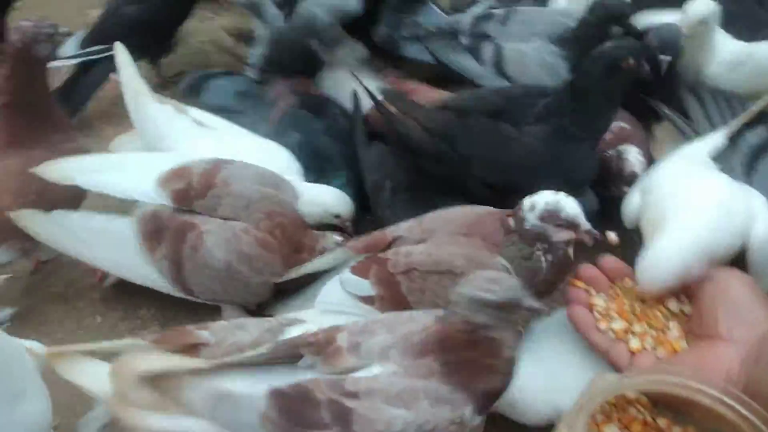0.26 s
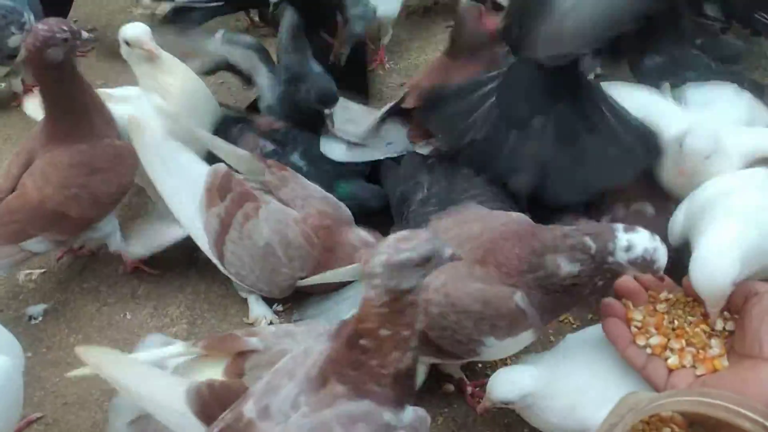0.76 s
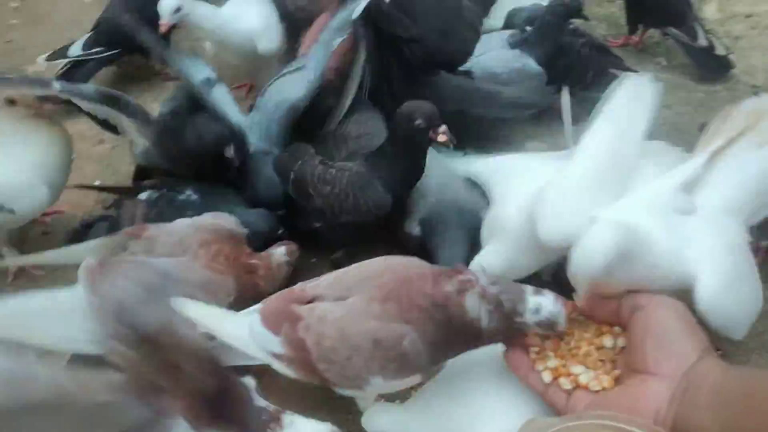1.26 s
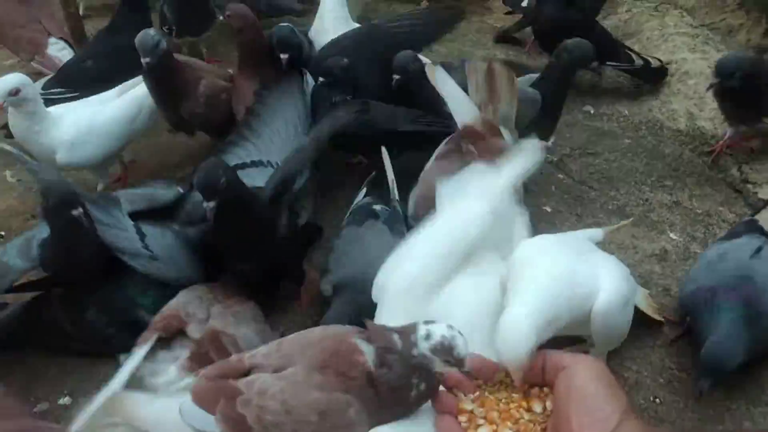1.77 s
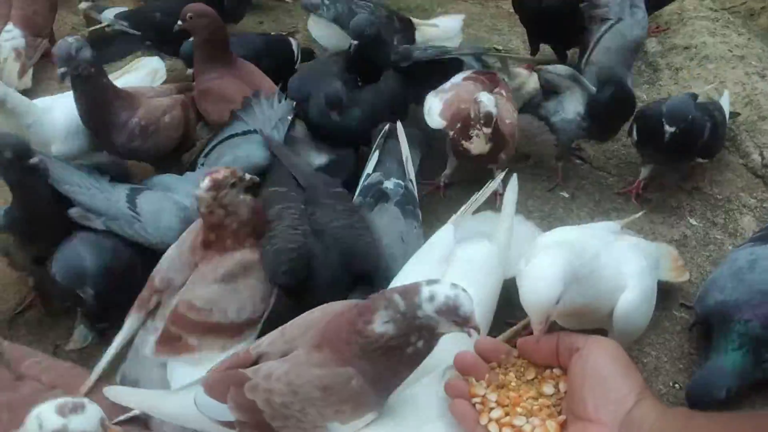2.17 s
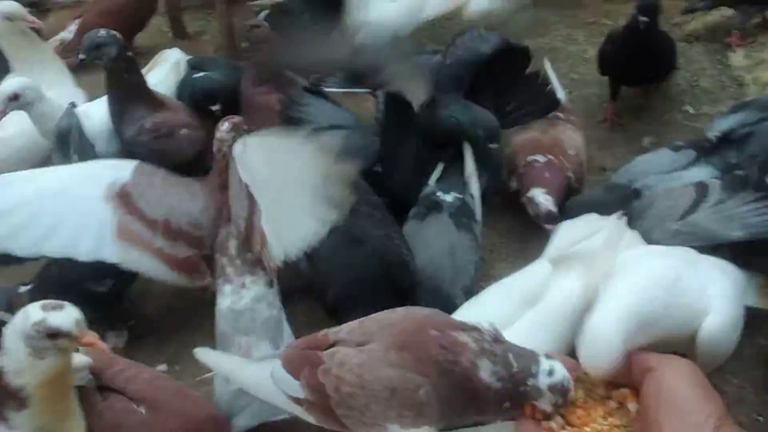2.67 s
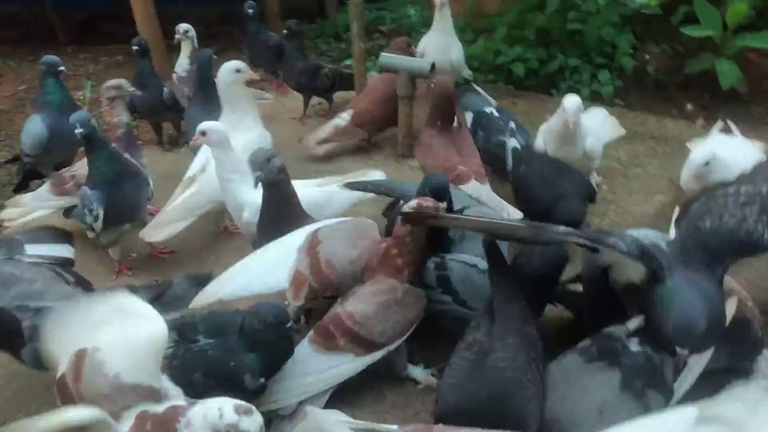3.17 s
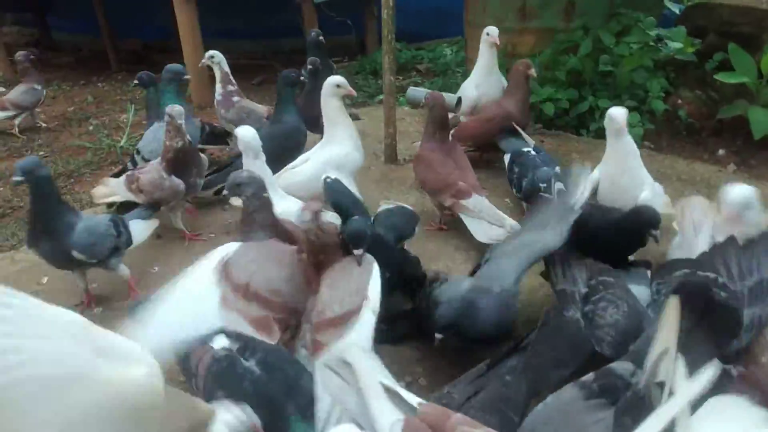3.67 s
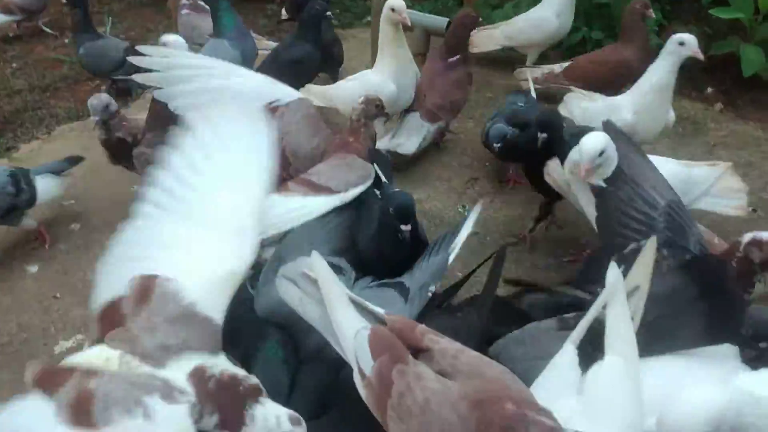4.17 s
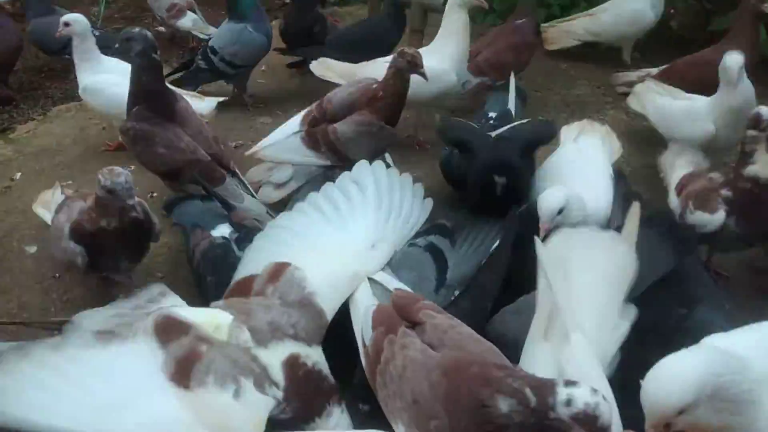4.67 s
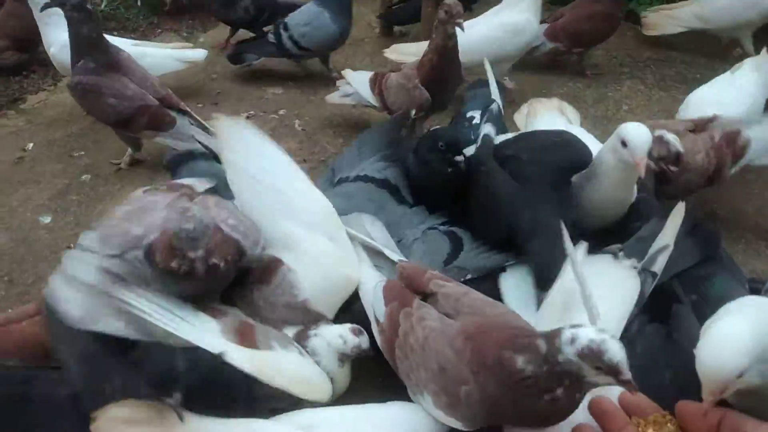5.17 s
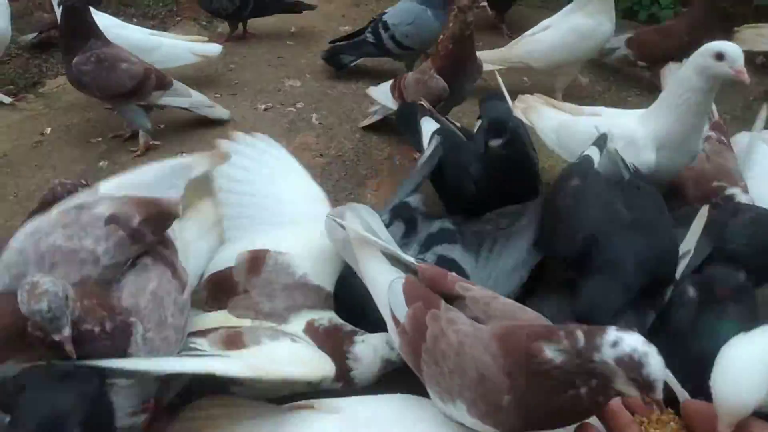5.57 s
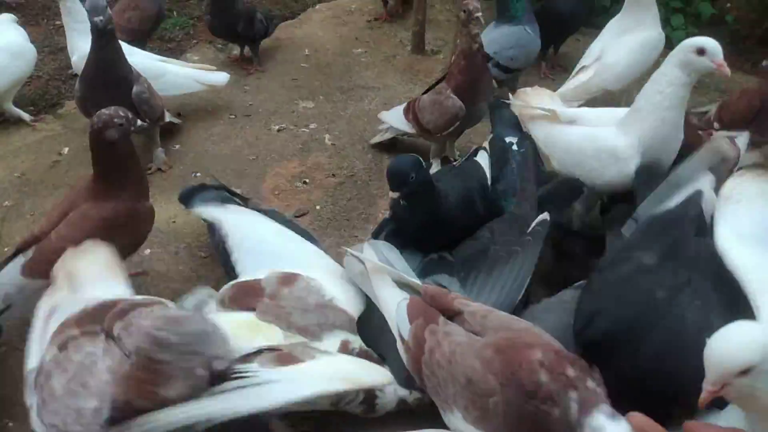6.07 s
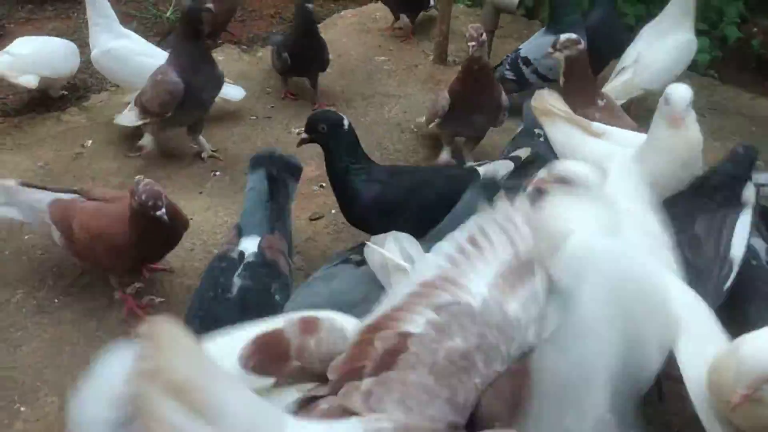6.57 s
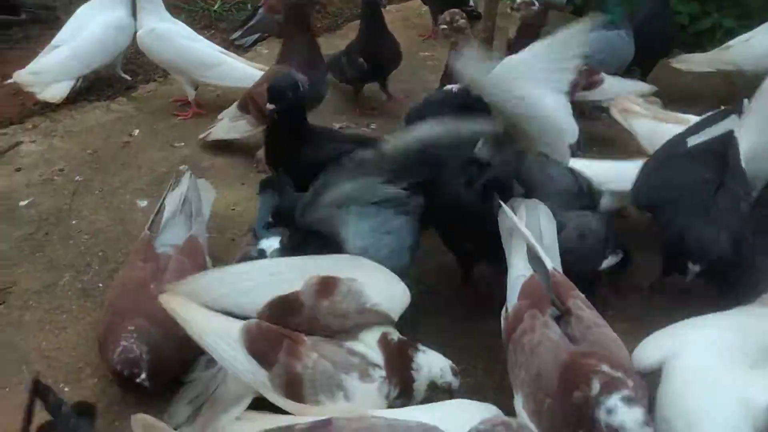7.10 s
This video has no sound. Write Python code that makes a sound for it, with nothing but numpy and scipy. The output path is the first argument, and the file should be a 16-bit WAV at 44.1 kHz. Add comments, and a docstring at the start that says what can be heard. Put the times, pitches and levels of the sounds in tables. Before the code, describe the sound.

Pigeons jostle for grain in a yard, feathers rustling, wings slapping, beaks tapping, young birds squeaking, with two husky coos and air thumps.

```python
"""Pigeons jostling for grain

A flock of pigeons jostles for grain held out in a hand, in an open yard. Feathers rustle by stick and slip,
wings slap as noise bursts and fan air over the microphone as pressure pulses, and beaks tap as damped
resonances. One bird coos twice with a crop-filtered octave, and youngsters squeak with two-voiced hoarse tones.
The left microphone port rings in the treble; the right one is covered and passes little but rumble."""
import sys
import numpy as np
from scipy import signal
from scipy.fft import rfft, irfft, next_fast_len
from scipy.io import wavfile

SR = 44100
rng = np.random.default_rng(int(sys.argv[2]) if len(sys.argv) > 2 else 0)


def transcribe(signal):
    """Save signal, clipped to [-1, 1], as a 16-bit WAV file at the path in sys.argv[1]."""
    frames = np.atleast_2d(signal).T
    limited = np.clip(frames, -1, 1)
    pcm = np.round(limited * 32767).astype(np.int16)
    wavfile.write(sys.argv[1], SR, pcm)


N = 323694
TIME = np.arange(N) / SR   # seconds


def from_db(db):
    """Level to amplitude: 20 dB is a factor of ten."""
    return 10 ** (np.asarray(db) / 20)


def rms_one(x):
    """Normalisation to unit effective value."""
    return x / np.sqrt(np.mean(x ** 2) + 1e-20)


def add(out, start_s, x):
    """Superposition: a short sound is summed in at its moment."""
    at = max(int(start_s * SR), 0)
    out[at:at + len(x)] += x[:max(N - at, 0)]


def butter(x, edges_hz, kind, order=2):
    """Causal Butterworth filter, maximally flat in its passband."""
    edges_hz = np.clip(edges_hz, 10, .48 * SR)
    return signal.sosfilt(signal.butter(order, edges_hz, kind, fs=SR, output="sos"), x)


def resonance(x, hz, width_hz):
    """Two-pole resonance: damping sets the width, and the gain at the peak is 1."""
    r = np.exp(-np.pi * width_hz / SR)
    feedforward = np.array([1, 0, -1]) * (1 - r * r) / 2
    feedback = [1, -2 * r * np.cos(2 * np.pi * hz / SR), r * r]
    return signal.lfilter(feedforward, feedback, x + 1e-18)


def double_resonance(x, hz, width_hz):
    """Two equal resonances in series give steeper skirts."""
    return resonance(resonance(x, hz, width_hz), hz, width_hz)


def colour(x, spectrum):
    """Linear filtering by a gain curve that is interpolated over log frequency."""
    hz, db = np.transpose(spectrum)
    size = next_fast_len(len(x))
    bins = np.maximum(np.arange(size // 2 + 1) * SR / size, 1)
    gain = from_db(np.interp(np.log(bins), np.log(hz), db))
    return irfft(rfft(x, size) * gain, size)[:len(x)]


def noise(spectrum):
    """Stationary coloured noise of unit rms."""
    return rms_one(colour(rng.standard_normal(N), spectrum))


def noise_band(low_hz, high_hz, order=2):
    """Band-limited noise of unit rms."""
    return rms_one(butter(rng.standard_normal(N), [low_hz, high_hz], "band", order))


def drift(per_s):
    """Random modulation of unit rms: straight lines join random values, per_s of them each second."""
    return rms_one(np.interp(TIME * per_s, np.arange(N), rng.standard_normal(N)))


def in_time(curve):
    """Linear interpolation of a control curve at every sample."""
    return np.interp(TIME, *np.transpose(curve))


def phase_of(pitch_hz):
    """Phase in radians is the time integral of frequency."""
    return 2 * np.pi * np.cumsum(pitch_hz) / SR


def yard_murmur(level_db):
    """Diffuse background: a stationary random sound with a fixed spectrum."""
    # Spectrum of the yard. Each row: frequency in Hz, relative density in dB.
    murmur_spectrum = [(40, -4.5), (65, 2), (100, -1), (130, -7.5), (195, -14), (250, -5.5), (300, -13.5),
                       (450, -12), (1000, -22), (2000, -29), (7000, -31), (10000, -29.5), (16000, -60)]
    return from_db(level_db) * noise(murmur_spectrum)


def drone():
    """Narrow-band noise: far-off motor noise arrives as a few blurred low tones."""
    # Blurred tones. Each row: frequency in Hz, half the resonator width in Hz, level in dB.
    drone_bands = [(81.5, 9.6, -55.5), (95.6, 10.6, -55), (246.7, 19, -66.5)]
    out = np.zeros(N)
    for hz, width_hz, db in drone_bands:
        out += from_db(db) * rms_one(double_resonance(rng.standard_normal(N), hz, 2 * width_hz))
    return out


def draught_rumble(spectrum, level_db, follows):
    """Modulated low-frequency noise: moving air rumbles, its level following the draught in part."""
    # Air stirred by the flock. Each row: time in seconds, draught level in dB (its mean is removed).
    draught_curve = [(0.0, -41), (1.12, -57.5), (1.47, -42), (1.86, -55), (2.33, -57.5), (2.8, -47.5),
                     (3.39, -48.5), (4.48, -60.5), (5.72, -57), (5.93, -61), (6.48, -57.5), (7.34, -55.5)]
    draught_db = in_time(draught_curve)
    return from_db(level_db + follows * (draught_db - draught_db.mean())) * noise(spectrum)


def far_calls(waver=0.019):
    """Spectral loss over distance leaves only one wavering partial of each animal call."""
    # Thin calls. Each row: start in seconds, length in seconds, mean pitch in Hz, level in dB.
    thin_calls = [(1.72, 0.045, 1220, -56.5), (1.86, 0.043, 1274, -56), (2.98, .42, 1043, -66.5),
                  (4.64, 0.24, 1181, -67.5), (7.17, 0.069, 2320, -63)]
    out, wobble = np.zeros(N), 1 + waver * drift(150)
    for s, length_s, hz, db in thin_calls:
        on = (TIME > s) & (TIME < s + length_s)
        partial = np.sin(phase_of(hz * wobble[on]))
        out[on] += from_db(db) * partial * signal.windows.tukey(on.sum(), .6)
    return out


def begging_notes(every_s=.113, fall=0.05, fade_db=3.5, raspier_db=4.5):
    """Repetition with fatigue: each further note of a bout is lower, its tone weaker and its rasp stronger."""
    # Bouts. Each row: start in seconds, number of notes, first note's pitch in Hz,
    # its relative tone level in dB, its relative rasp level in dB.
    begging_bouts = [(0.31, 2, 2880, -53.5, -55.5), (0.904, 2, 2936, -52, -58.5), (1.52, 2, 2580, -54, -58),
                     (2.21, 1, 3200, -50.5, -64), (2.739, 1, 3085, -51.5, -52), (2.96, 1, 2605, -60, -56.5),
                     (3.125, 1, 3250, -62.5, -78), (3.965, 2, 2785, -53.5, -59.5),
                     (4.825, 3, 3135, -51.5, -63), (5.655, 2, 2360, -52, -61), (6.68, 1, 3270, -54.5, -61),
                     (6.95, 1, 1995, -64.5, -61.5)]
    notes = []
    for s, count, hz, tone_db, rasp_db in begging_bouts:
        for k in range(round(count)):
            notes.append((s + k * every_s, hz * (1 - fall * k), tone_db - fade_db * k, rasp_db + raspier_db * k))
    return notes


def squeaks(note_s=0.1416, hoarseness=0.0284, scoop=0.07, droop=0.0398, second_ratio=.81, second_db=-7.5,
            level_db=-0.5, rasp_db=-2.5, flutter_db=2.0):
    """Two-source voice: both sides of a young syrinx whistle hoarsely, scoop up and sag, over a noisy rasp."""
    # Harmonics of each side. Each row: multiple of its pitch, relative level in dB.
    squeak_partials = [(1, -12.5), (2, -1), (3, -10.5)]
    out, wobbles, flutter = np.zeros(N), (drift(1200), drift(1200)), from_db(flutter_db * drift(180))
    rasp = noise_band(3900, 6300, order=3)
    for s, hz, tone_db, noise_db in begging_notes():
        on = (TIME > s) & (TIME < s + note_s)
        u = (TIME[on] - s) / note_s   # 0 to 1 through the note
        arch = 1 - scoop * (1 - u) ** 4 + droop * (.5 - u)
        voice = from_db(noise_db + rasp_db) * rasp[on]
        for ratio, db, wobble in zip((1, second_ratio), (tone_db, tone_db + second_db), wobbles):
            phase = phase_of(hz * ratio * (arch + hoarseness * wobble[on]))
            for k, partial_db in squeak_partials:
                voice = voice + from_db(db + level_db + partial_db) * np.sin(round(k) * phase)
        out[on] += voice * flutter[on] * np.sin(np.pi * u ** 0.61)
    return out


def clucks(bend=0.11, fall_s=0.0097, rise_s=0.0018, decay_s=0.0099, level_db=9.5, gruffness=0.1, husk_db=-23.0):
    """Impulsive voicing: a short push of the throat gives a gruff, husky hoot that drops in pitch as it dies."""
    # Notes that open each coo. Each row: start in seconds, relative level in dB, pitch in Hz before the bend.
    stuttered_notes = [(0.713, -35, 420), (0.791, -41.5, 367), (0.892, -44, 330), (1.872, -44, 400),
                       (1.958, -36, 409), (2.05, -37.5, 378), (2.146, -42.5, 355)]
    out, t, wobble = np.zeros(N), TIME[:SR // 8], drift(300)
    husk = from_db(husk_db) * noise_band(280, 600)
    envelope = (1 - np.exp(-t / rise_s)) * np.exp(-t / decay_s)
    for s, db, hz in stuttered_notes:
        here = slice(int(s * SR), int(s * SR) + len(t))
        pitch = hz * (1 + bend * np.exp(-t / fall_s) + gruffness * wobble[here])
        hoot = np.sin(phase_of(pitch)) + husk[here]
        add(out, s, from_db(db + level_db) * hoot * envelope)
    return out


def coos(jitter=0.018, shimmer_db=2.3, attack_s=0.044, release_s=0.089, husk_db=-13, bend=0.129, settle_s=0.0338,
         crop_hz=507, crop_width_hz=56, crop_db=5):
    """Source and filter: the swollen crop lifts the octave of a husky tone as it nears the crop resonance."""
    # Drawn-out ends. Each row: start in seconds, length in seconds,
    # first and last pitch in Hz before bend and jitter, mean level in dB of the fundamental before fades.
    drawn_out_notes = [(0.90, 0.35, 307, 268, -46), (2.165, 0.30, 278, 222, -45.5)]
    out, wobble, tremble_db = np.zeros(N), 1 + jitter * drift(92), shimmer_db * drift(70)
    husk = from_db(husk_db) * noise_band(280, 520)
    for s, length_s, first_hz, last_hz, db in drawn_out_notes:
        on = (TIME > s) & (TIME < s + length_s)
        t = TIME[on] - s
        # starts sharp, settles, then sinks steadily
        pitch = np.linspace(first_hz, last_hz, len(t)) * (1 + bend * np.exp(-t / settle_s))
        octave = from_db(crop_db) / (1 + (2 * (2 * pitch - crop_hz) / crop_width_hz) ** 2)
        phase = phase_of(pitch * wobble[on])
        envelope = np.minimum(t / attack_s, 1) * np.minimum((length_s - t) / release_s, 1)
        voice = np.sin(phase) + octave * np.sin(2 * phase) + husk[on]
        out[on] += from_db(db + tremble_db[on]) * envelope * voice
    return out


def jostling(level_db=-3.5, swing=0.83):
    """Energy addition: the flock's shoving and the bell-shaped swells of near wing sweeps sum in power."""
    # How hard the flock jostles. Each row: time in seconds, rustle level in dB before swing and offset.
    jostle_curve = [(0.0, -54.5), (0.41, -53), (0.59, -48.5), (1.14, -52.5), (1.29, -48), (1.49, -46),
                    (1.78, -49), (2.51, -55.5), (2.8, -49.5), (3.43, -56), (4.03, -52), (4.66, -57.5),
                    (5.72, -53.5), (5.95, -62), (6.32, -55), (6.58, -43), (7.03, -56.5), (7.34, -54.5)]
    # Wings sweeping over a neighbour's feathers. Each row: middle in seconds, level in dB,
    # half length in seconds.
    wing_sweeps = [(0.436, -47, 0.02), (0.524, -43.5, 0.021), (0.734, -46, 0.035), (1.362, -45, 0.021),
                   (1.427, -41, 0.0078), (2.823, -46.5, 0.013), (6.596, -39, .007), (6.697, -45, 0.038)]
    flock_db = in_time(jostle_curve)
    mean_db = flock_db.mean()
    near = np.zeros(N)
    for s, db, half_s in wing_sweeps:
        near += from_db(db) * np.exp(-((TIME - s) / half_s) ** 2 / 2)
    return np.hypot(from_db(level_db + mean_db + swing * (flock_db - mean_db)), near)


def rustle(shove_db=1.15, shoves_per_s=11, stroke_db=2.5, flutter_db=1.0, snags_per_s=260, snag_spread_db=9.5,
           snag_db=-12.5):
    """Stick-slip friction: feathers slide in short strokes; barbs snag and let go with tiny ticks."""
    # Spectrum of sliding feathers. Each row: frequency in Hz, relative density in dB.
    feather_spectrum = [(100, 13), (500, 8), (1200, 1.5), (2500, -1.5), (4500, -1.5), (7000, 1.5),
                        (10000, -1.5), (13000, -2), (16000, -1)]
    unevenness_db = shove_db * drift(shoves_per_s) + stroke_db * drift(35) + flutter_db * drift(260)
    effort = jostling() * from_db(unevenness_db)
    sizes = from_db(snag_spread_db * np.minimum(rng.exponential(1, N), 4)) * rng.choice([-1, 1], N)
    happens = rng.random(N) < snags_per_s / SR
    snags = rms_one(colour(sizes * happens, feather_spectrum))
    return effort * (noise(feather_spectrum) + from_db(snag_db) * snags)


def tap(hz, decay_s=0.0022, damping=0.63, rise_s=0.00028, scratch_db=-29.0):
    """Impact excitation: a brief scratchy contact drives one heavily damped resonance."""
    t = TIME[:SR // 30]
    length_s = decay_s * (2000 / hz) ** .5   # small hard contacts die sooner
    contact = (1 - np.exp(-t / rise_s)) * np.exp(-t / length_s)
    scratch = np.sign(rng.standard_normal(len(t))) * contact
    ringing = double_resonance(scratch, hz, damping * hz)
    return rms_one(ringing) * np.std(scratch) + from_db(scratch_db) * scratch


def pecks(level_db=0.5, ticks_db=-48.5, steps_db=-50.5, count=70):
    """Random superposition: near beaks tap clearly; the rest of the flock ticks and patters faintly."""
    # Nearest beaks on grain, skin and ground. Each row: start in seconds, relative level in dB,
    # resonance in Hz.
    near_beaks = [(0.414, -45, 895), (0.937, -41.5, 1220), (1.455, -26.5, 1810), (2.51, -38, 1160),
                  (2.951, -45, 1600), (3.009, -37, 1900), (3.339, -45.5, 1950), (3.463, -40, 1350),
                  (3.605, -40, 10200), (3.695, -36, 10900), (4.017, -30, 10200), (4.469, -35.5, 850),
                  (4.68, -49, 4900), (4.985, -35.5, 4600), (5.186, -50, 8500), (5.566, -39.5, 2900),
                  (5.977, -45, 5000), (6.218, -46.5, 7000), (6.29, -43.5, 1510)]
    out = np.zeros(N)
    for s, db, hz in near_beaks:
        add(out, s, from_db(db + level_db) * tap(hz))
    for tick_at, step_at, size, pitch in rng.random((count, 4)):
        add(out, tick_at * N / SR, from_db(ticks_db) * size * tap(5500 * 2 ** pitch))
        add(out, step_at * N / SR, from_db(steps_db) * size * tap(800 * 2 ** pitch))
    return out


def gusts():
    """Unsteady flow: each stroke pushes then pulls the air, and its eddies buffet the port (swing, eddies)."""
    # Wing strokes. Each row: middle in seconds, relative pressure swing in dB, relative turbulence in dB,
    # half length in seconds, upper edge of the turbulence in Hz.
    wing_strokes = [(0.465, -40, -44, .033, 150), (0.715, -27.5, -40.5, .01, 200),
                    (1.357, -13.5, -34.5, 0.0092, 120), (1.431, -29, -30, .01, 150),
                    (1.451, -17, -18.5, 0.0038, 170), (1.47, -24, -19, .012, 290),
                    (1.49, -22, -30, .0047, 695), (1.518, -42, -33.5, .024, 149),
                    (2.82, -40, -44, .02, 120), (6.601, -47, -31, 0.0074, 520),
                    (6.69, -39.5, -49, 0.031, 350), (7.11, -45.5, -49.5, .04, 130)]
    swing, eddies, t = np.zeros(N), np.zeros(N), TIME[:SR // 2]
    for s, swing_db, eddy_db, half_s, edge_hz in wing_strokes:
        u = (t - t.mean()) / half_s
        bell = np.exp(-u * u / 2)
        turbulence = butter(rng.standard_normal(len(t)), edge_hz, "low")
        swirl = butter(turbulence, 60, "high") * bell
        add(swing, s - t.mean(), -from_db(swing_db) * 2 * u * bell ** 2)
        add(eddies, s - t.mean(), from_db(eddy_db) * rms_one(swirl) * np.sqrt(np.mean(bell ** 2)))
    return swing, eddies


def slaps(crack_db=-4.5, tail_db=-19.0, tail_s=0.016, quill_db=10.5, rise_share=0.16):
    """Impact noise with two decays: quills strike raggedly over the wing's duller clap, then slide apart."""
    # Wing slaps. Each row: start in seconds, relative crack level in dB, relative body level in dB,
    # time constant of the main decay in seconds.
    wing_slaps = [(0.403, -30.5, -41, 0.0032), (0.483, -27, -51, 0.0019), (0.507, -27, -27.5, .0045),
                  (0.589, -29.5, -40, .0035), (0.6246, -20, -23, 0.0033), (0.708, -23.5, -31.5, 0.0015),
                  (0.859, -38, -44, 0.0056), (0.902, -32.5, -60, 0.0013), (0.938, -33, -39, 0.002),
                  (0.992, -41, -45, .0036), (1.347, -30, -36, 0.0055), (1.363, -31, -33, 0.0066),
                  (1.445, -19, -31, 0.0038), (1.469, -22.5, -36, 0.002), (1.617, -42.5, -38, .006),
                  (2.762, -39, -40, .0054), (2.812, -39, -37, 0.0064), (3.01, -27.5, -56, 0.0011),
                  (3.013, -30, -60, 0.0014), (6.584, -25.5, -35, 0.012), (6.6, -20.5, -25, 0.0038),
                  (6.639, -24, -25, 0.0036), (6.785, -38, -46, .005), (6.809, -35.5, -38.5, 0.0018)]
    out, t = np.zeros(N), TIME[:SR // 6]
    volley = np.tanh(rng.standard_normal(N)) * from_db(quill_db * np.tanh(drift(2500)))
    quills = rms_one(butter(volley, [1300, 14000], "band", order=1))
    clap = np.sign(butter(rng.standard_normal(N), 1500, "low"))
    clap = rms_one(butter(clap, [270, 1300], "band"))
    for s, crack, body_db, decay_s in wing_slaps:
        here = slice(int(s * SR), int(s * SR) + len(t))
        attack = 1 - np.exp(-t / (rise_share * decay_s))
        decay = np.exp(-t / decay_s) + from_db(tail_db) * np.exp(-t / tail_s)
        strike = from_db(crack + crack_db) * quills[here] + from_db(body_db) * clap[here]
        add(out, s, attack * decay * strike)
    return out


def yard(x, scatter_db, t60, wall_hz=6500):
    """Reverberation: walls, posts and bushes scatter back a short, dull tail that loses 60 dB in t60 seconds."""
    t = TIME[:SR // 2]
    scattered = butter(rng.standard_normal(len(t)), wall_hz, "low", order=1)
    tail = scattered * from_db(-60 * t / t60) * (t > .006)
    return x + from_db(scatter_db) * signal.fftconvolve(x, tail / np.sqrt(np.sum(tail ** 2)))[:N]


def through_cover(x, smear_s=0.0011):
    """Multipath transmission: sound leaks into the covered port by many short paths, muffled and smeared."""
    # Transmission of the cover. Each row: frequency in Hz, gain in dB.
    cover_gain = [(20, -20), (90, -11), (250, -25.5), (600, -23.5), (1500, -29), (4000, -36.5), (7500, -31),
                  (11000, -31), (16000, -18)]
    t = TIME[:SR // 50]
    paths = rng.standard_normal(len(t)) * np.exp(-t / smear_s)
    return colour(signal.fftconvolve(x, paths / np.sqrt(np.sum(paths ** 2)))[:N], cover_gain)


def scene(yard_db=-55.5, rumble_left_db=-49.0, left_follows=0.36, rumble_right_db=-41.5, right_follows=0.86,
          open_db=2.5, swing_right_db=-1.0):
    """Superposition at two receivers: an open port and a covered one, each with its own wind rumble."""
    # Wind on the open and covered ports. Each row: frequency in Hz, relative density in dB.
    open_wind, covered_wind = [(10, 7.5), (25, 5), (45, 3), (80, -22.5), (150, -23), (400, -60),
                               (2000, -81)], [(10, 6), (25, 6), (45, 0.5), (80, -9.5), (150, -19.5),
                                               (400, -33.5), (2000, -64)]
    contacts = yard(slaps() + pecks(), scatter_db=-18.5, t60=0.095)
    voices = yard(coos() + clucks() + squeaks() + far_calls(), scatter_db=-12.0, t60=0.21)
    air = contacts + voices + rustle() + yard_murmur(yard_db) + drone()
    swing, eddies = gusts()
    left = from_db(open_db) * (air + swing + eddies)
    left += draught_rumble(open_wind, rumble_left_db, left_follows)
    right = from_db(open_db) * through_cover(air)
    right += from_db(swing_right_db) * butter(swing, 30, "low", order=1)
    right += draught_rumble(covered_wind, rumble_right_db, right_follows)
    return np.array([left, right])


def record(dry, hiss_db=-73.5, port_hz=7460, port_width_hz=796, port_db=18, cutoff_hz=15850):
    """Cavity resonance: the open port rings in the treble; both sides hiss faintly and the top is cut."""
    left = dry[0] + (from_db(port_db) - 1) * resonance(dry[0], port_hz, port_width_hz)
    both = np.array([left, dry[1]]) + from_db(hiss_db) * rng.standard_normal((2, N))
    return signal.sosfilt(signal.ellip(10, .2, 80, cutoff_hz, fs=SR, output="sos"), both)


dry = scene()
out = record(dry)
transcribe(out)
```